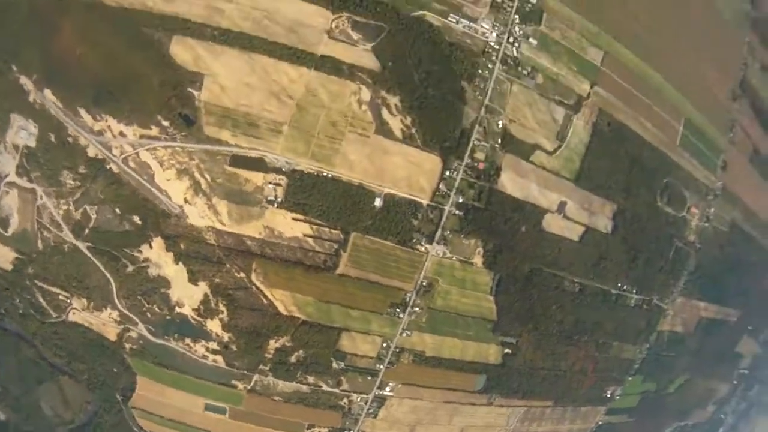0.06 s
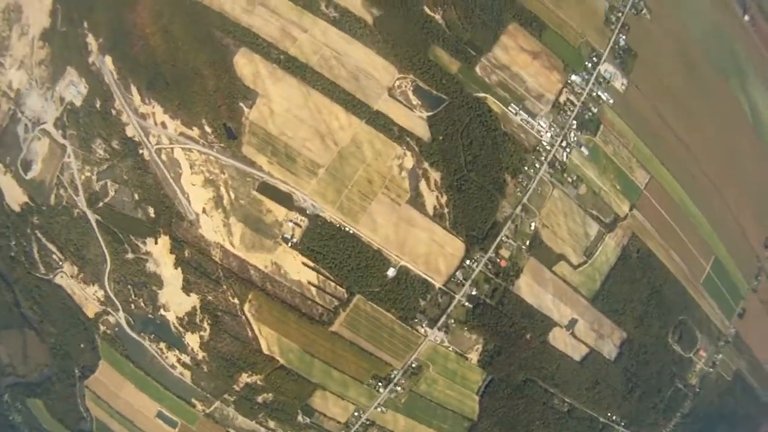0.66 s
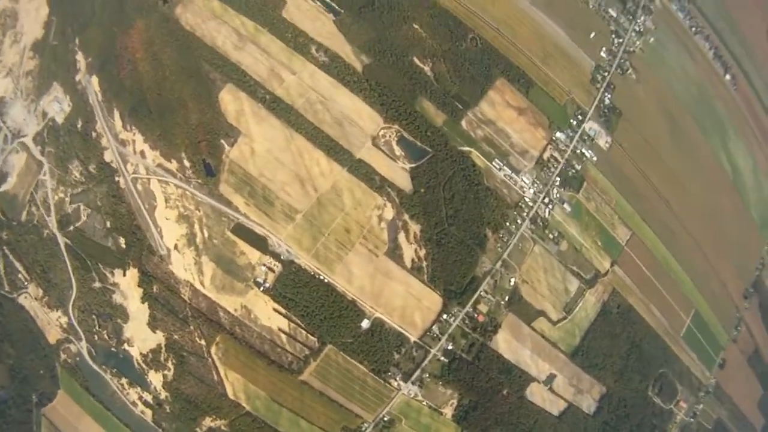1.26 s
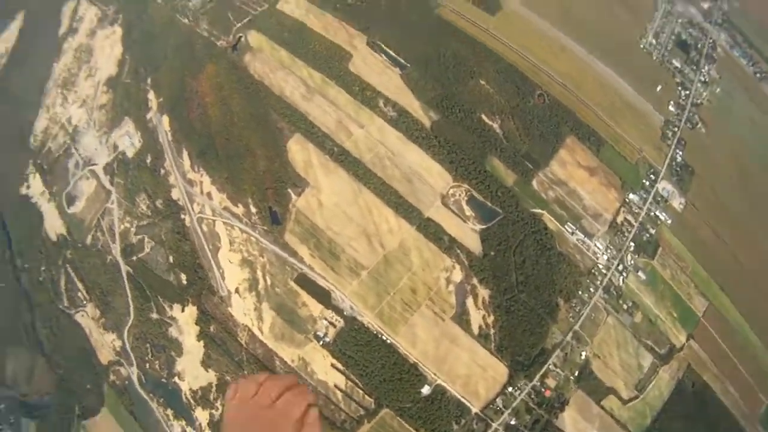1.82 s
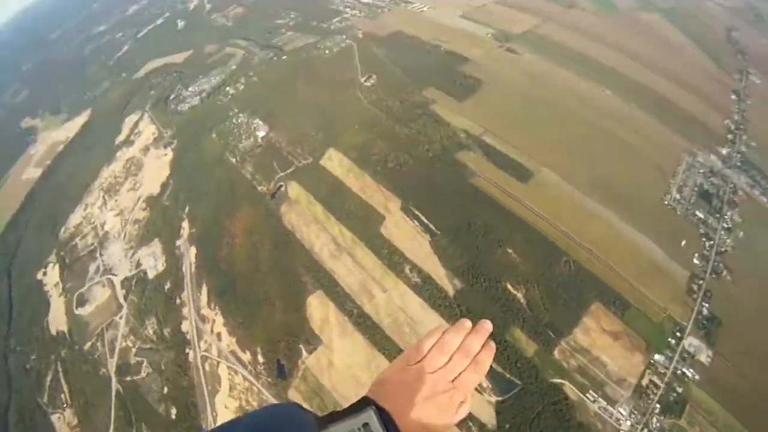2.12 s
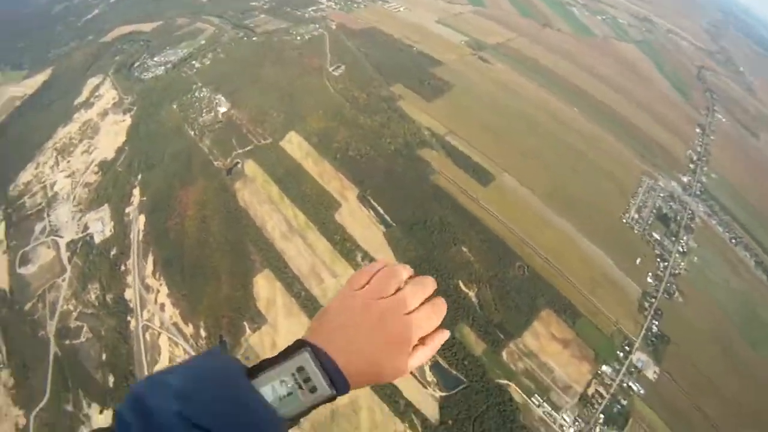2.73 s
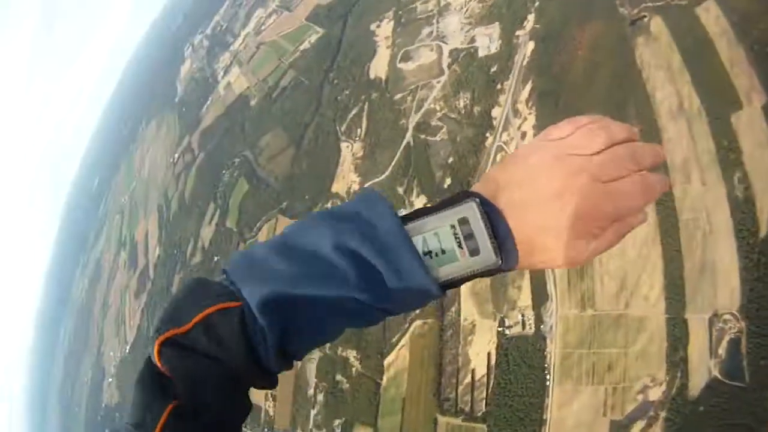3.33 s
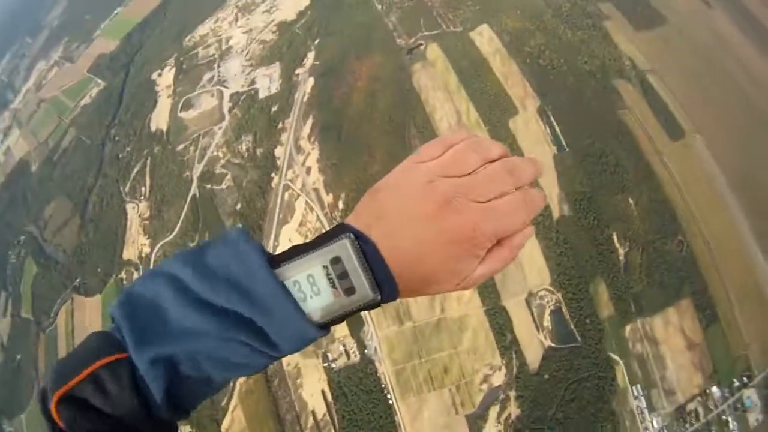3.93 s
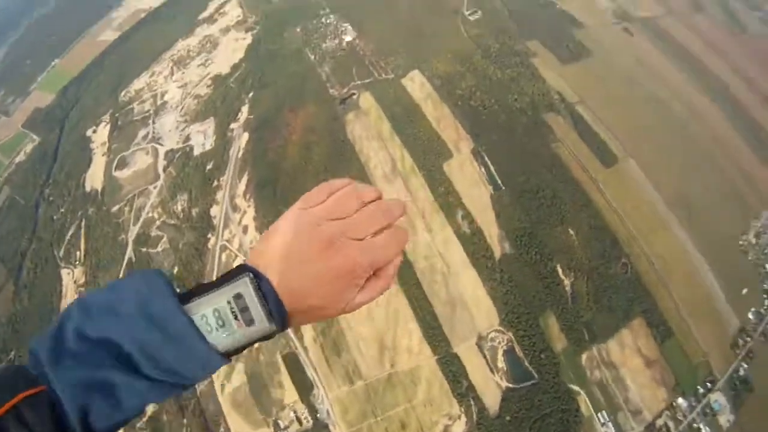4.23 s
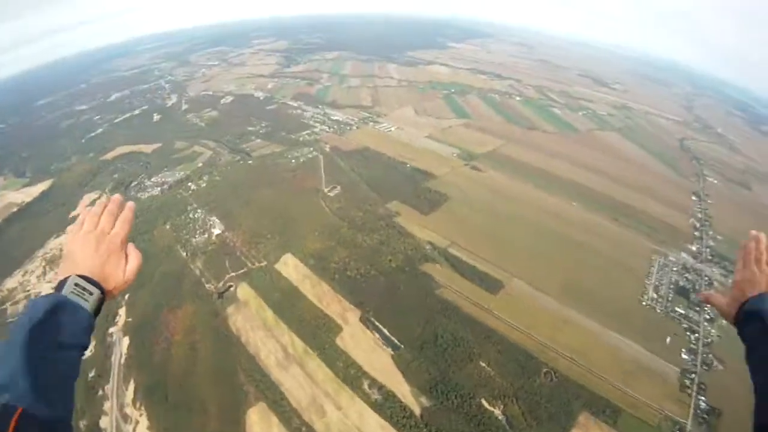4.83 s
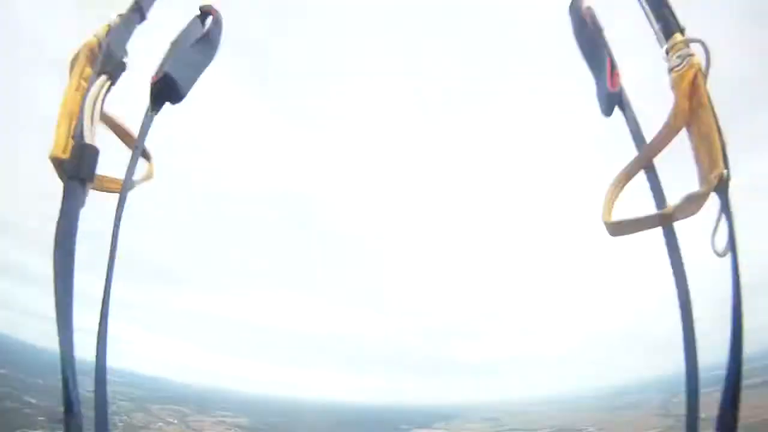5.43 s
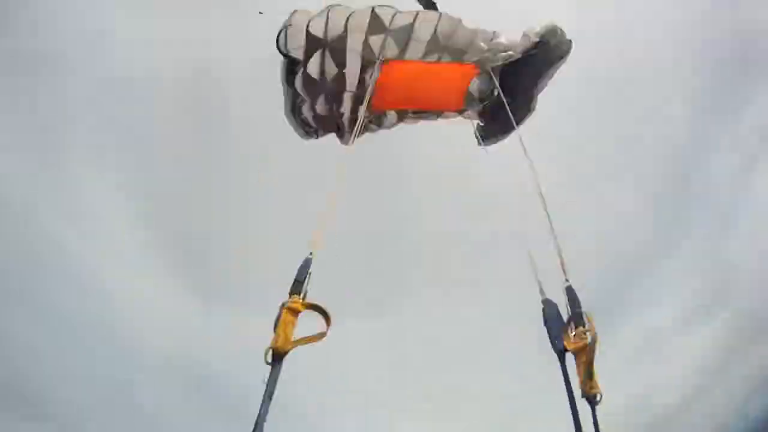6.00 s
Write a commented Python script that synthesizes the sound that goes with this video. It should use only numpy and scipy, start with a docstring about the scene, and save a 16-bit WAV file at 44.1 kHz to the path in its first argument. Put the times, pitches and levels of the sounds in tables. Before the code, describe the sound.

Loud wind roars from the start, hollow and hissing, heard from inside a closed case on a skydiver's helmet in free fall. For the first second a taut edge buzzes unsteadily in the airstream, and a faint hoot rises at about 1.4 seconds. From around 2 seconds low buffeting thumps the case more heavily, easing near 3 seconds and building again at 4.5, while the roar stays steady with an occasional short crack. Close to 5 seconds the wind starts to fall away amid a few quick snaps. At about 5.2 seconds one sharp, loud knock overloads the microphone as the parachute is pulled out, and everything ducks briefly. From 5.4 seconds the wind comes back much weaker and gusty, with low rumble and the flapping and crackling of unfolding cloth, until about 6 seconds.

```python
"""Free fall and opening parachute

Heard from inside a closed camera case on a skydiver's helmet. The airstream makes the case roar
and eddies buffet it; at first a taut edge buzzes in the wind. As the parachute is pulled out, a knock
overloads the microphone and the gain control ducks. The wind returns weaker, with flapping cloth."""
import sys
import numpy as np
from scipy import signal
from scipy.fft import rfft, irfft, next_fast_len
from scipy.io import wavfile

SR = 44100
rng = np.random.default_rng(int(sys.argv[2]) if len(sys.argv) > 2 else 0)


def wrap_up_sound(samples):
    """Save the sound to the file named by the first command line argument, as 16-bit audio."""
    columns = np.atleast_2d(samples).T
    # keep every value between -1 and 1, then stretch to whole-number steps
    tamed = np.clip(columns, -1, 1)
    steps = np.round(tamed * 32767).astype(np.int16)
    wavfile.write(sys.argv[1], SR, steps)


N = 267238
TIME = np.arange(N) / SR

# The airstream, steady until the parachute brakes the fall. Each row: time in seconds, level in dB.
AIRSTREAM = [(0, -16.7), (.8, -17.7), (1.15, -15.8), (2.0, -15), (2.3, -16.4), (4.55, -16.1), (4.9, -18.3),
             (5.23, -30), (5.42, -30), (5.55, -26.7), (5.72, -30), (6.06, -34.5)]
# Its swells and lulls. Each row: centre in seconds, half length in seconds, boost or dip in dB.
SWELLS = [(.05, .025, 1.6), (.33, .04, 1.8), (.45, .05, -1.5), (.57, .05, 2.3), (2.61, .035, -2),
          (3.23, .03, 1.5), (3.33, .03, -1.5), (4.62, .025, 1.6), (4.69, .04, -3.8), (5.0, .01, -3),
          (5.06, .025, -6.5), (5.135, .03, 4), (5.518, .018, 2.5), (5.635, .015, -6), (5.78, .025, -2.5),
          (5.88, .04, 1.5)]
# Sharp gusts and cracks of cloth. Each row: start in seconds, strength in dB.
CRACKS = [(.35, -9), (.581, -12.5), (2.33, -11.5), (2.753, -9), (4.962, -12), (4.98, -14), (5.014, -14),
          (5.033, -10), (5.131, -16), (5.219, -17.5), (5.253, -16.5), (5.283, -14.5), (5.553, -12.5),
          (5.595, -19), (5.659, -13.5), (5.712, -22), (6.029, -18.5)]
# The modes of the case. Each row: pitch in Hz, width in Hz, weight in dB.
CASE_MODES = [(560, 420, -23.5), (902, 234, -14.5), (1149, 280, -5), (1449, 385, -6.5), (1630, 304, -6.5),
              (2077, 400, -2.5), (2357, 430, -1), (3070, 315, -11.5), (3545, 427, -7.5), (4454, 820, -18.5),
              (5205, 690, -19), (6760, 660, -20.5), (7530, 880, -22), (8430, 400, -14.5), (8909, 290, -20),
              (9670, 530, -12), (10400, 460, -21), (10810, 230, -22), (13130, 320, -24), (13650, 480, -24),
              (14340, 520, -14.5), (15140, 260, -24)]
# The underside of the helmet whistles once the diver hangs upright. Each row: pitch in Hz, width in Hz, weight
# in dB.
UNDERSIDE_WHISTLES = [(890, 190, -2), (1130, 220, .5), (2075, 190, .8)]
# Posture colours the wind. Each row: time in seconds, hollow modes and hissing modes in dB
# relative to the airstream, drone level in dB.
POSTURE = [(0, -6, -7.5, -33), (.33, -5.3, -6.3, -30), (.4, -6.3, -9, -29.5), (.9, -8.6, -9.8, -31),
           (1.35, -4.5, -6.6, -31.2), (1.9, -4.8, -7.8, -30.3), (2.15, -1.5, -12.5, -27.5),
           (2.7, -1.5, -12, -27.3), (2.95, -2.4, -12, -34.5), (4.15, -1.7, -14, -32.5),
           (4.8, -2.2, -15, -37), (5.25, -1.5, -18.5, -37), (6.06, -1.5, -13.5, -36)]
# The eddies grow whenever the head lifts. Each row: time in seconds, strength in dB.
EDDY_STRENGTH = [(0, -5.5), (.35, -3), (.8, -8), (1.9, -5), (2.15, 6), (2.45, 9), (2.78, 7), (2.95, .5),
                 (3.65, 1), (4.0, -3), (4.33, -2), (4.5, 6.5), (5.05, 8), (5.38, 4), (5.55, 10.8),
                 (5.85, 4.5), (6.06, 5.5)]
# The tone of large and of small eddies. Each row: frequency in Hz, relative spectral level in dB.
LARGE_EDDY_SPECTRUM = [(15, -16), (30, -6), (48, -0.5), (60, 1), (80, -7), (120, -18), (220, -45)]
SMALL_EDDY_SPECTRUM = [(70, -34), (105, -7), (130, -1), (180, -.5), (260, -3.5), (350, -10.5), (480, -13),
                       (700, -18), (1100, -24)]
# A gap hoots as the head turns. Each row: time in seconds, level in dB.
GAP_HOOT = [(0, -30.5), (1.0, -36), (1.3, -37), (1.42, -25.5), (1.6, -31), (2.0, -37), (2.7, -37),
            (3.1, -55)]
# The buzzing edge. Each row: time in seconds, pitch in Hz, level in dB.
EDGE_BUZZ = [(0, 274, -30), (.06, 277, -24.5), (.25, 277, -32), (.42, 281, -26.5), (.53, 278, -28),
             (.59, 284, -25), (.72, 277, -27), (.89, 273, -25.2)]
# Its timbre. Each row: harmonic number, weight in dB.
EDGE_HARMONICS = [(1, -4.5), (2, -8), (3, -13), (4, -1.5), (5, -13)]

KNOCK_S, CANOPY_S = 5.1795, 5.4
UPRIGHT_S, UPRIGHT_TURN_S = 5.07, .03   # the diver swings upright
FREE_FALL_DB = -16   # the airstream at full speed


def roar(flutter):
    """The case rings under the airstream; the angle of the head decides which modes it drives."""
    hollow_db, hiss_db, _ = curves(POSTURE)
    wind, cracks, cloth = from_db(airstream()) * flutter, snaps(), canopy_crackle()
    force = np.hypot(wind, cracks)
    hiss_force = np.hypot(from_db(hiss_db) * wind, from_db(-11.5) * cracks)   # cracks hiss at any angle
    top_force = np.hypot(from_db(-8.4) * force, cloth)
    upright = .5 + .5 * np.tanh((TIME - UPRIGHT_S) / UPRIGHT_TURN_S)
    body = from_db(-.3) * blown_modes(modes_between(1900, 2700), force, flicker_db=.25)
    bite = from_db(-3.9 + .28 * hiss_db) * blown_modes(modes_between(2700, 4000), force, flicker_db=.6)
    hollow_gain = from_db(hollow_db + .5 * flicker(2.5, 7))
    hollow = hollow_gain * blown_modes(modes_between(0, 1900), force, flicker_db=.85)
    whistle = from_db(.3) * upright * blown_modes(UNDERSIDE_WHISTLES, force, flicker_db=.8)
    hiss = blown_modes(modes_between(4000, 8000), hiss_force, flicker_db=.5)
    top = blown_modes(modes_between(8000, np.inf), top_force, flicker_db=.2)
    leak = from_db(-2.5) * cloth * rng.standard_normal(N)   # crackle passing straight through the case
    return port_notch(body + bite + hollow + whistle + hiss + top + leak)


def airstream():
    """The wind's level in dB: the speed of the fall, with each gust a smooth bump on it."""
    fall_db, = curves(AIRSTREAM)
    return fall_db + sum(db * np.exp(-((TIME - s) / half_s) ** 2) for s, half_s, db in SWELLS)


def turbulence():
    """Passing eddies make the force of the air flutter."""
    depth_db = follow_flow(1.5, per_eddy_db=.03, per_slowing_db=.08)
    waver = .35 * flicker(4, 16) + .77 * flicker(23.6, 110) + .77 * flicker(110, 610)
    return from_db(depth_db * waver - .16 * depth_db ** 2)   # the offset holds the mean power


def blown_modes(modes, force, flicker_db):
    """One turbulent force rings a family of modes; rms about 1 for a force of 1."""
    # neighbouring modes are driven at unrelated spots
    drives = [rng.standard_normal(N) * force * from_db(flicker_db * flicker(8, 80)) for _ in range(3)]
    ringing = sum(from_db(db) * resonate(drives[k % 3], hz, width_hz)
                  for k, (hz, width_hz, db) in enumerate(modes))
    power = sum(from_db(db) ** 2 * width_hz * np.pi / (2 * SR) for _, width_hz, db in modes)
    return ringing / np.sqrt(power)


def port_notch(x, hz=6010, width_hz=380):
    """The port on the way to the microphone cancels one band."""
    return signal.lfilter(*signal.iirnotch(hz, hz / width_hz, fs=SR), x)


def buffeting(flutter):
    """Eddies thump the whole case and blow across the cavities around it."""
    _, _, drone_db = curves(POSTURE)
    hoot_db, = curves(GAP_HOOT)
    large_db = follow_flow(-30.8, per_eddy_db=.78, per_slowing_db=.33)
    large = from_db(large_db) * shaped_noise(LARGE_EDDY_SPECTRUM)
    small_db = follow_flow(-31.6, per_eddy_db=1.05, per_slowing_db=.03) + 1.55 * flicker(4.1, 25)
    small = from_db(small_db) * flutter ** .5 * shaped_noise(SMALL_EDDY_SPECTRUM)
    boom_db = follow_flow(-28.2, per_eddy_db=.33, per_slowing_db=.4)
    boom = blown_cavity(boom_db, hz=83, width_hz=36)
    drone = blown_cavity(drone_db, hz=273, width_hz=102)
    hoot = blown_cavity(hoot_db, hz=849, width_hz=113)
    return large + small + boom + drone + hoot


def blown_cavity(level_db, hz, width_hz):
    """Air passing an opening sounds its one resonance."""
    return from_db(level_db) * rms_one(resonate(rng.standard_normal(N), hz, width_hz))


def knock(thud_hz, thud_s, ring_hz, ring_s, thud_db, ring_db, rattle_db, size=SR // 10):
    """The opening rig jolts the case: a thud, then its main mode rings over a rattle of all its modes."""
    age = TIME[:size]
    thud = -from_db(thud_db) * np.sin(2 * np.pi * thud_hz * age) * np.exp(-age / thud_s)
    ring = from_db(ring_db) * np.sin(2 * np.pi * ring_hz * age)
    rattle = sum(from_db(.8 * db) * resonate(rng.standard_normal(size), hz, width_hz)
                 for hz, width_hz, db in CASE_MODES)
    envelope = age / ring_s * np.exp(1 - age / ring_s)
    jolt = thud + (ring + from_db(rattle_db) * rms_one(rattle)) * envelope
    start = round(KNOCK_S * SR)
    return np.pad(jolt, (start, N - start - size))


def buzzing_edge(release_db_per_s=380):
    """A taut edge vibrates unsteadily until the flow changes direction."""
    pitch_hz, level_db = curves(EDGE_BUZZ)
    release_db = release_db_per_s * np.clip(TIME - EDGE_BUZZ[-1][0], 0, 1)
    phase = 2 * np.pi * np.cumsum(pitch_hz * (1 + .0115 * flicker(8, 120))) / SR
    tone = sum(from_db(db + 3.4 * flicker(6, 72)) * np.sin(round(k) * phase) for k, db in EDGE_HARMONICS)
    return from_db(level_db - release_db) * np.sqrt(2) * tone


def snaps(decay_s=.0046):
    """Each crack is a sudden push of air that dies in a few milliseconds."""
    force = np.zeros(N)
    for start_s, db in CRACKS:
        start = round(start_s * SR)
        force[start:] += from_db(db) * np.exp(-TIME[:N - start] / decay_s)
    return force


def canopy_crackle(per_s=140, level_db=-43, scatter_db=2.4, decay_s=.0028):
    """The unfolding cloth gives small, sharp pushes at random."""
    onsets = (rng.random(N) < per_s / SR) & (TIME > CANOPY_S)
    sizes = from_db(level_db + scatter_db * np.minimum(rng.exponential(1, N), 3))
    return signal.lfilter([1], [1, -np.exp(-1 / (decay_s * SR))], onsets * sizes + 1e-18)


def follow_flow(base_db, per_eddy_db, per_slowing_db):
    """A curve in dB that rises as the eddies grow and as the fall slows."""
    eddy_db, = curves(EDDY_STRENGTH)
    fall_db, = curves(AIRSTREAM)
    return base_db + per_eddy_db * eddy_db + per_slowing_db * (FREE_FALL_DB - fall_db)


def modes_between(low_hz, high_hz):
    """The modes of the case in one band."""
    return [mode for mode in CASE_MODES if low_hz <= mode[0] < high_hz]


def resonate(x, hz, width_hz):
    """A resonance with steep skirts and gain 1 at its peak."""
    b, a = signal.iirpeak(hz, hz / width_hz, fs=SR)
    return signal.sosfilt([np.r_[b, a]] * 2, x + 1e-18)


def shaped_noise(spectrum):
    """Noise with the given spectrum, rolling off beyond its ends; rms 1."""
    hz, db = np.transpose(spectrum)
    size = next_fast_len(N)
    bin_hz = np.maximum(np.fft.rfftfreq(size, 1 / SR), 1)
    colour = from_db(np.interp(np.log(bin_hz), np.log(hz), db))
    roll_off = np.minimum(1, bin_hz / hz[0]) * np.minimum(1, hz[-1] / bin_hz) ** 2
    return rms_one(irfft(rfft(rng.standard_normal(size)) * colour * roll_off, size)[:N])


def flicker(low_hz, high_hz, size=N // 12):
    """Random wavering between two rates; spread 1."""
    band = signal.butter(2, [low_hz, high_hz], "band", fs=SR * size / N, output="sos")
    waver = rms_one(signal.sosfilt(band, rng.standard_normal(2 * size))[size:])
    return np.interp(TIME, np.linspace(0, TIME[-1], size), waver)


def curves(rows):
    """One automation curve for each column after the time."""
    times, *columns = np.transpose(rows)
    return [np.interp(TIME, times, column) for column in columns]


def from_db(db):
    """Decibels to gain."""
    return 10 ** (np.asarray(db) / 20)


def rms_one(x):
    """Scale to rms 1."""
    return x / np.sqrt(np.mean(x ** 2) + 1e-20)


def gain_control(x, threshold_db, release_db_per_s, lag_s, attack_s):
    """An overload ducks the gain a moment later; it then creeps back."""
    over_db = np.maximum(20 * np.log10(np.abs(x).max(axis=0) + 1e-9) - threshold_db, 0)
    held_db = np.maximum.accumulate(over_db + release_db_per_s * TIME) - release_db_per_s * TIME
    late_db = np.interp(TIME - lag_s, TIME, held_db)
    pole = np.exp(-1 / (attack_s * SR))
    return x * from_db(-signal.lfilter([1 - pole], [1, -pole], late_db))


def scene():
    """Everything meets at the one microphone inside the case."""
    flutter = turbulence()
    jolt = knock(thud_hz=560, thud_s=.00062, ring_hz=2083, ring_s=.0019,
                 thud_db=25, ring_db=12.5, rattle_db=9)
    return (roar(flutter) + buffeting(flutter) + buzzing_edge() + jolt)[None]


def record(dry):
    """Gain control, hard clipping just under full scale, and a steep cut of the top."""
    ducked = gain_control(dry, threshold_db=-2.5, release_db_per_s=91, lag_s=.0034, attack_s=.0046)
    high_cut = signal.ellip(14, .1, 95, 15450, fs=SR, output="sos")
    return signal.sosfilt(high_cut, np.clip(ducked, -.92, .92))


dry = scene()
out = record(dry)
wrap_up_sound(out)
```